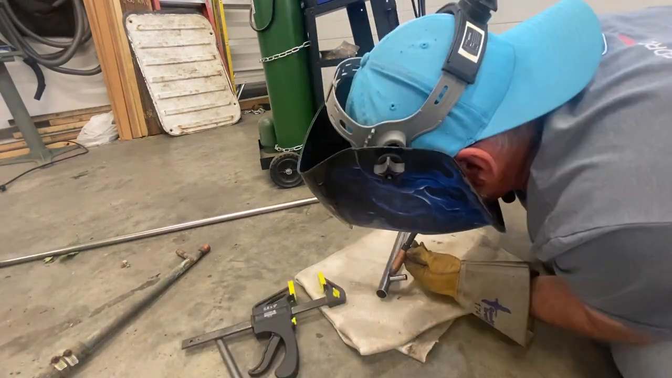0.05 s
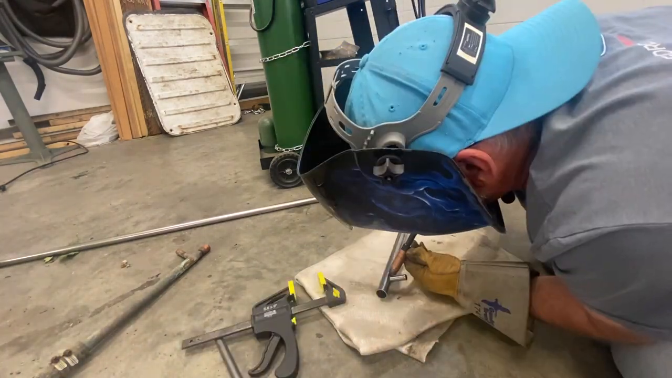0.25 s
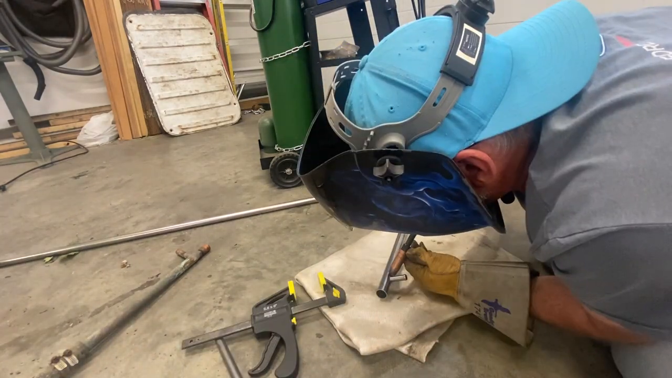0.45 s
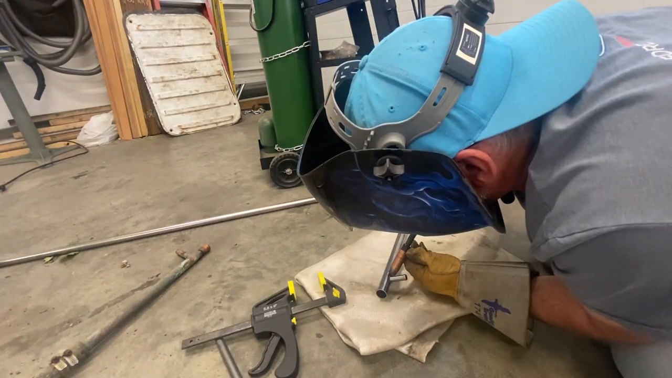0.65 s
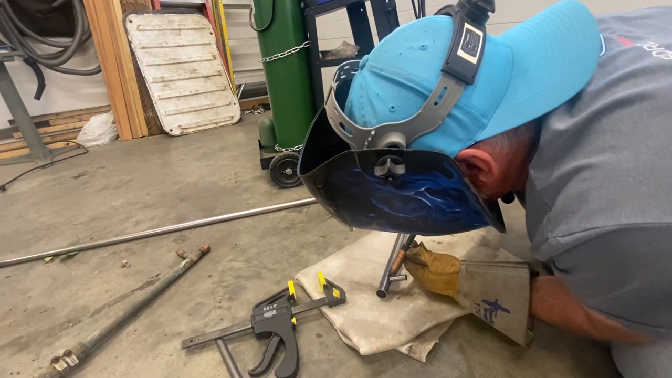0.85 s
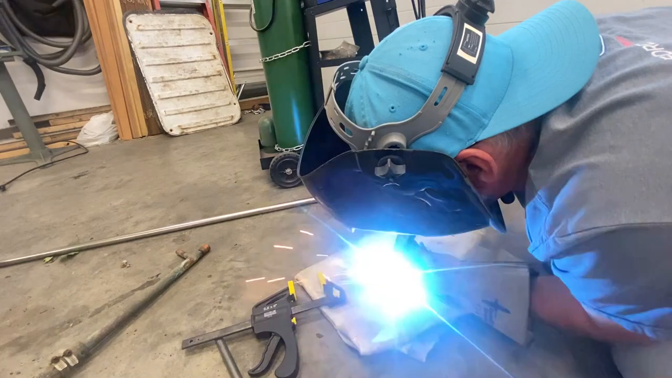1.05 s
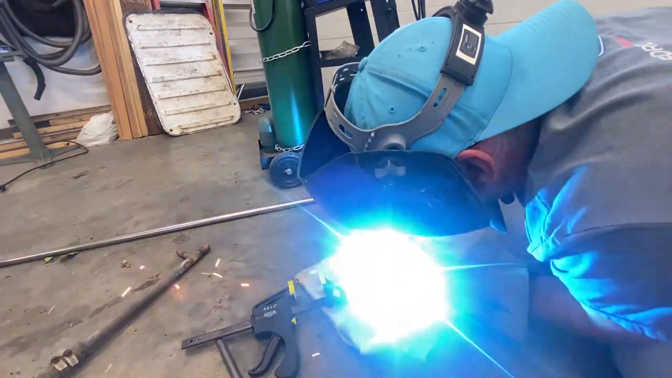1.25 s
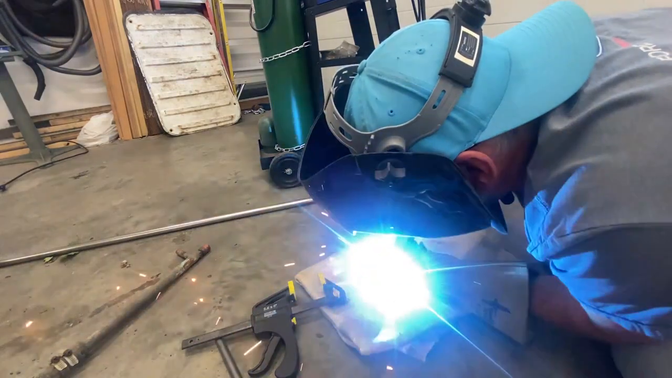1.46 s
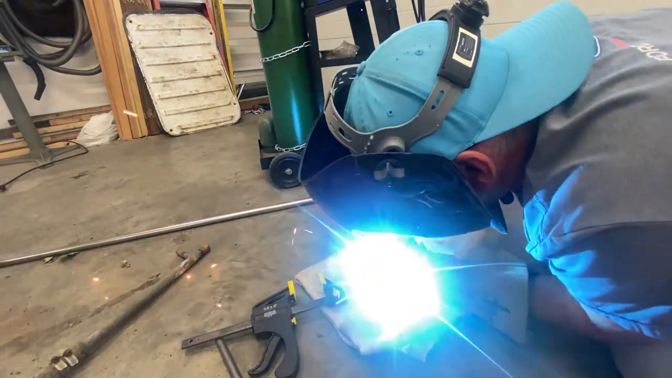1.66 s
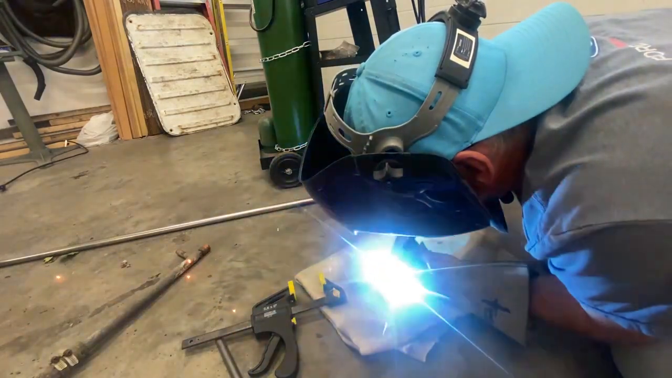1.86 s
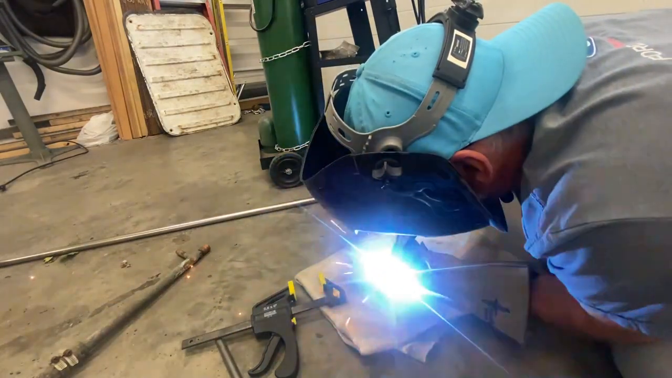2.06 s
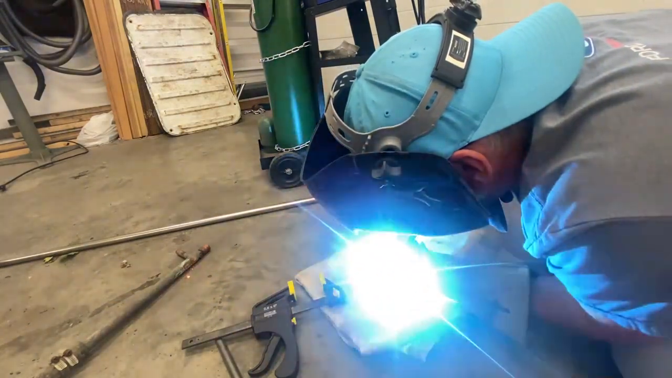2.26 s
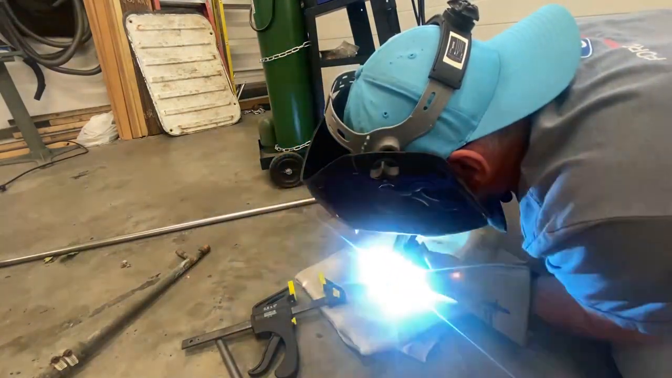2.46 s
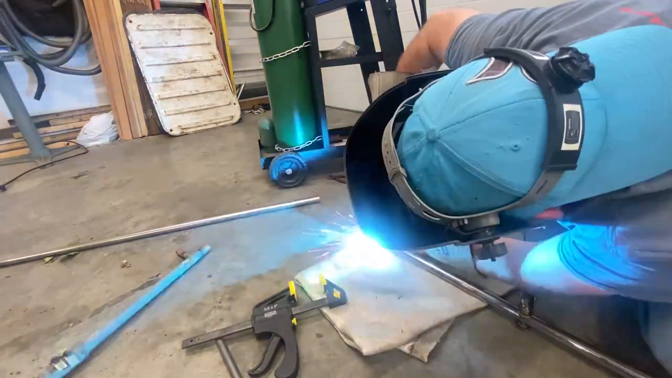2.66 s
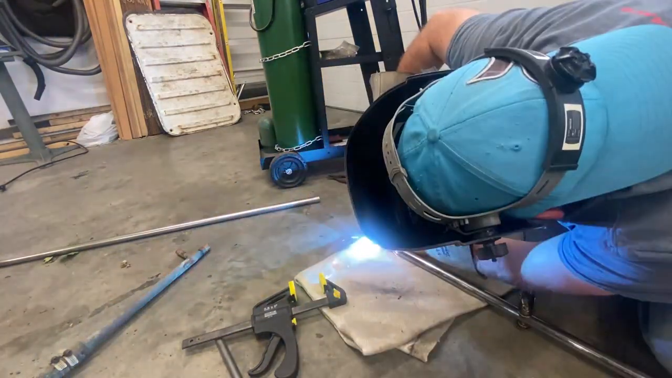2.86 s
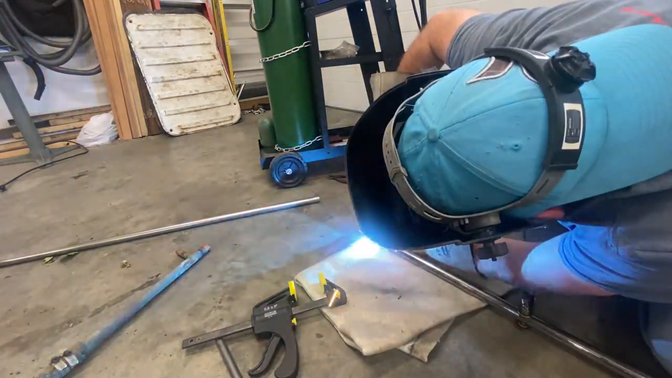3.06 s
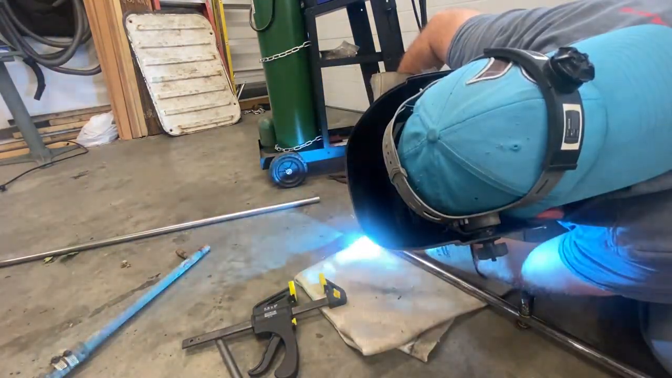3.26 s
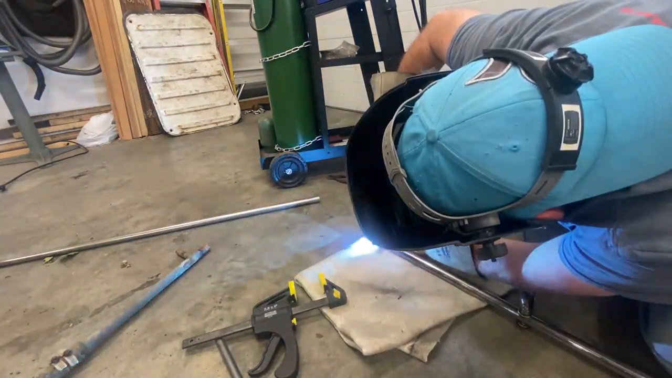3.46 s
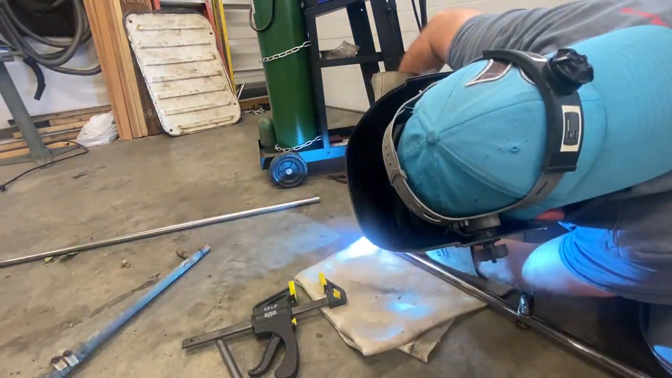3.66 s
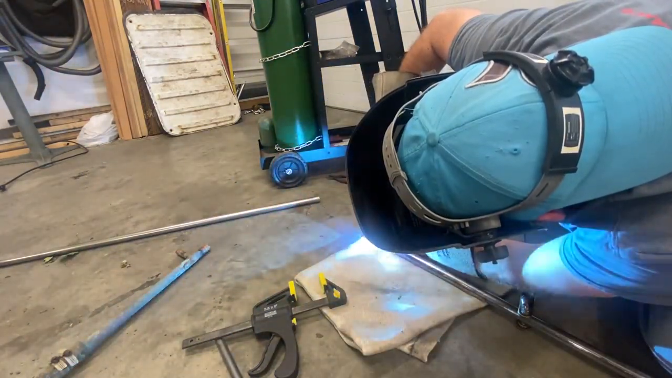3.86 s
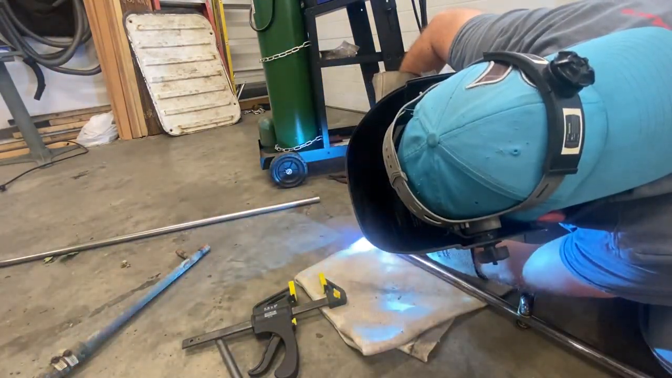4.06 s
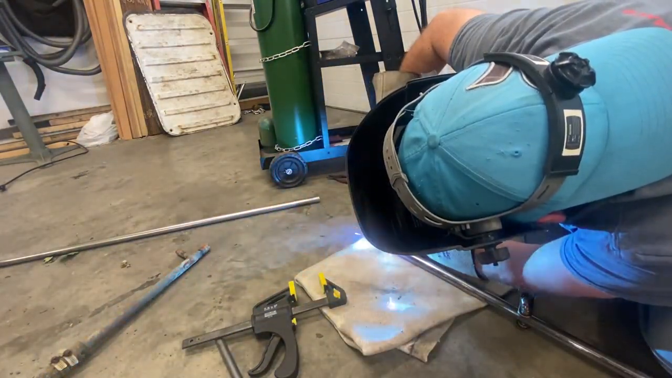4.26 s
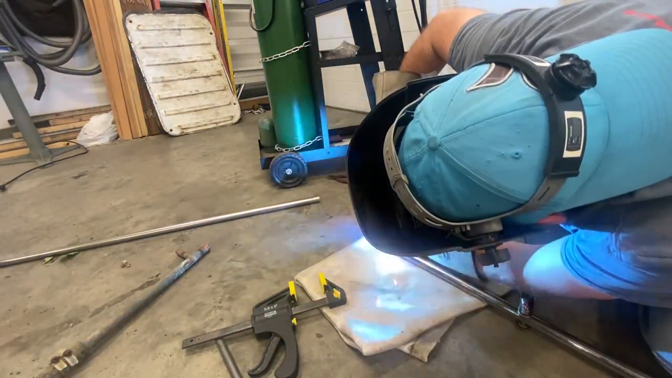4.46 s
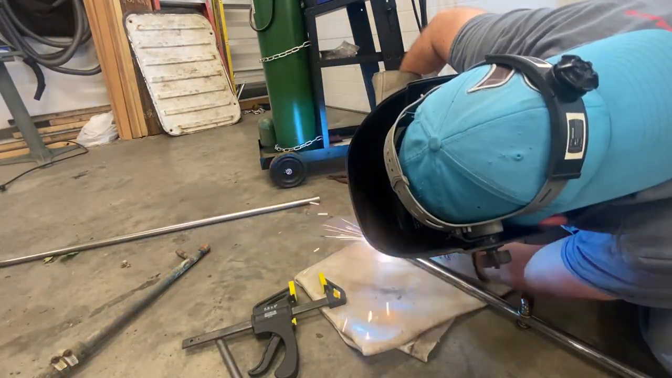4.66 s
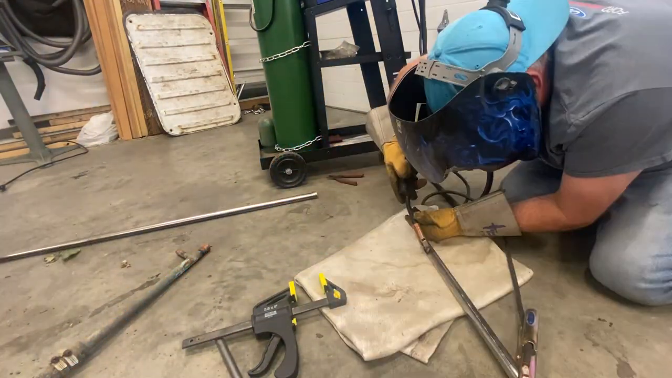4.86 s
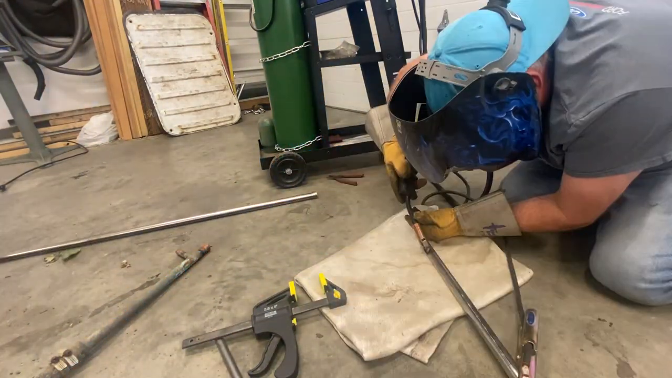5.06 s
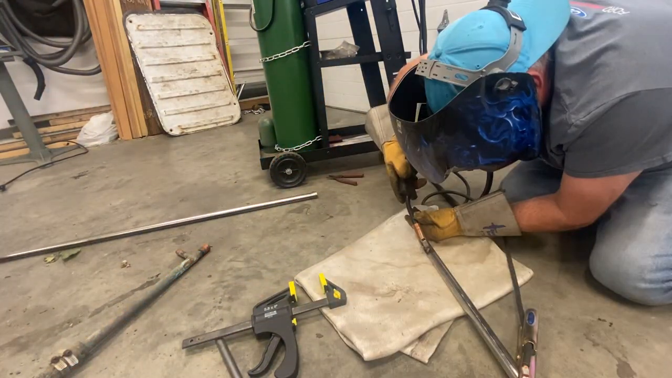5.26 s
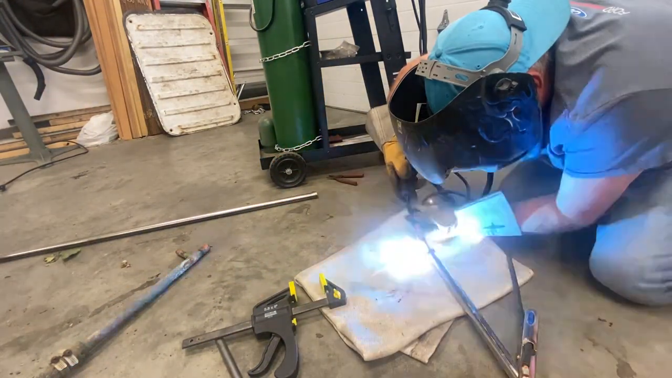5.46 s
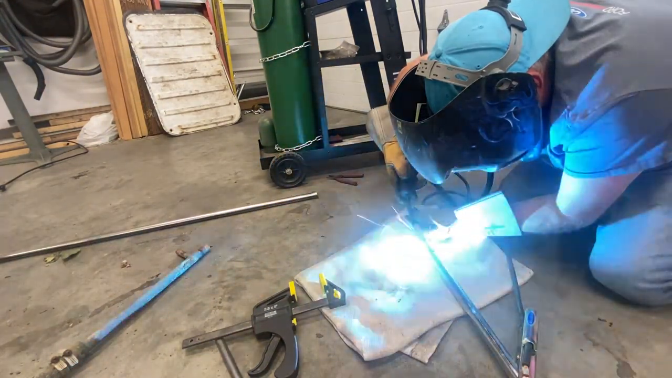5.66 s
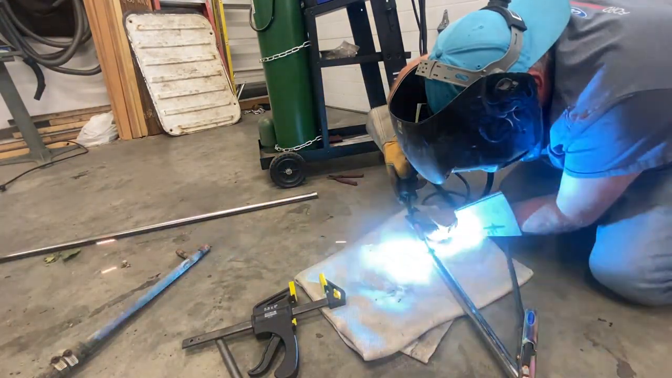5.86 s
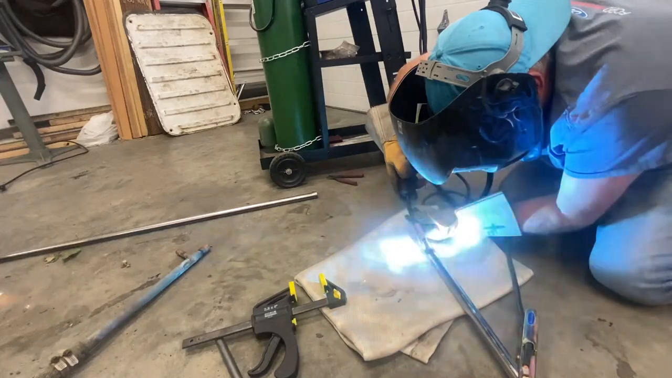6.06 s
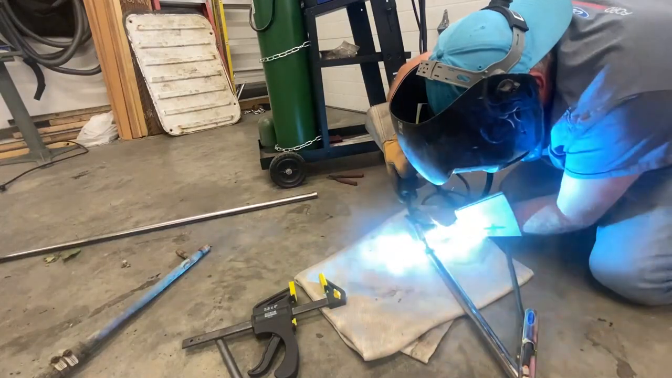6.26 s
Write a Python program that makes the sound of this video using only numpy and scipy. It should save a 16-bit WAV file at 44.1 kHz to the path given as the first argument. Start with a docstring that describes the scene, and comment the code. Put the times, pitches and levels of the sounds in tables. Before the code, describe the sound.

Three short electric welds on metal pipe, heard close up in a hard-walled garage. Each has buzzing, frying hiss and irregular rapid pops over steady gas flow and machine hum. The first is bright and snappy, the second bassy and muffled, fading to fine crackle. The third begins with gas hiss and motor whir, then spits strongly until it stops. Changes between welds are abrupt.

```python
"""Silence first; then gas hiss and a machine's hum fade in: a wire-feed welder in a concrete garage.
A feeder motor whirs up and the arc sizzles with the mains ripple, under sharp pops.
Each pop is a short circuit of the wire breaking: a filtered thud, a shove of air, a snap and crackle.
Three short welds, each from another position, are cut hard together; concrete walls return a short tail."""
import sys
import numpy as np
from scipy import signal
from scipy.fft import rfft, irfft
from scipy.io import wavfile
from scipy.ndimage import map_coordinates

SR = 44100
rng = np.random.default_rng(int(sys.argv[2]) if len(sys.argv) > 2 else 0)


def makeup_ratio(level_db):
    """Linear amplitude ratio for a level in decibels (20 dB per factor of ten)."""
    decades = np.asarray(level_db, float) / 20
    return 10 ** decades


def digitize_waveform(pressure):
    """Quantize a signal to 16-bit integers and store it at the path in sys.argv[1].

    Rows of a 2-D input are taken as channels; values are limited to [-1, 1].
    """
    field = np.atleast_2d(pressure).T
    bounded = np.clip(field, -1, 1)
    quanta = np.round(bounded * 32767).astype(np.int16)
    wavfile.write(sys.argv[1], SR, quanta)


N = 278712
T = np.arange(N) / SR

# fan blade tone, one a weld: pitch_hz
BLADE_HZ = (237.6, 236.9, 236.2)
# fan blade tone and its harmonics: multiple, relative level_db
FAN_TONES = [(1, 5.5), (2, 2.5), (3, -5), (5, 6.5), (7, 8)]
# gas jet and fan air, one list a weld: pitch_hz, width_hz, relative level_db
GAS_1 = [(380, 130, -5.5), (750, 310, -4), (1480, 300, 1), (1600, 70, 3.5), (3320, 490, -13),
         (4290, 420, 5), (5600, 820, -2.5), (6300, 1100, -6.5), (8650, 600, 4.5), (12700, 2600, -10.5)]
GAS_2 = [(340, 600, 10.5), (1600, 550, 15), (3500, 3300, -9), (6200, 3000, -6), (12300, 2700, -1)]
GAS_3 = [(71.3, 36, -6), (464, 330, -5.5), (783, 110, -1.5), (1350, 440, 0), (1610, 340, -1),
         (4350, 720, -8.5), (5300, 640, -1), (6050, 1130, 5), (7400, 1100, -4.5), (8860, 510, 0),
         (12400, 1700, -6), (14300, 1500, -3.5)]
# garage decay: pitch_hz, t60_s
GARAGE_DECAY = [(200, 0.3), (1500, 0.23), (6000, 0.36), (14000, 0.36)]
# treble sent back by the walls, without the nozzle's beam: pitch_hz, width_hz, relative level_db
DIFFUSE = [(4090, 3000, 1.5), (7580, 2900, 5), (8800, 860, 2.5), (15100, 2700, -6)]
# floor, body and cart bounces, one list a weld: delay_ms, level_db
BOUNCES = [
    [(1.3, -8.5), (2.5, -11), (5.0, -15.5)],
    [(.82, -9.5), (2.46, -5.5), (2.86, -10.5), (4.37, -14)],
    [(.66, -9.5), (2.39, -9), (4.92, -16.5)],
]
# nozzle and pipe resonances in the arc's treble, one list a weld: pitch_hz, width_hz, relative level_db
ARC_1 = [(3480, 920, -5), (4346, 444, 6), (5230, 770, -8), (6620, 1900, -5.5), (8710, 690, 4.5),
         (11880, 730, -11.5), (13000, 700, -3), (14580, 530, 1), (14700, 570, -21)]
ARC_2 = [(2655, 730, -3), (4440, 2130, -8), (5800, 420, -6), (7440, 960, -1), (8900, 1270, -6.5),
         (11870, 1780, -1.5), (13400, 900, -5), (14830, 1000, -3.5)]
ARC_3 = [(4298, 260, -10), (5230, 650, -7), (7160, 2040, -3), (8900, 370, -1), (11700, 400, -6),
         (13200, 1400, -9), (14700, 850, -3)]
# gain of the arc's middle band, between bass and fizz: time_s, level_db
SHADE = [(1.1, -4), (2.6, 1.5), (2.7, 4), (3.3, -0.5), (3.8, -4), (4.76, -2), (5.4, -2), (6.3, 3)]
# the burning arc between pops, one list a weld, before its colour: time_s, level_db
SIZZLE = [
    [(1.078, -48.5), (1.458, -42), (2.612, -51)],
    [(2.688, -58), (2.708, -54), (2.72, -45.5), (3.18, -38), (4.76, -44.5)],
    [(5.415, -60), (5.801, -47.5), (6.32, -42)],
]
# single arc re-ignitions, loud and faint, levels before colour and room: time_s, thud_db, crack_db
POPS = [(1.086, -19, -10), (1.1759, -37, -12), (1.185, -24, -23), (1.2663, -18.5, -17.5),
        (1.282, -18.5, -18.5), (1.2944, -24.5, -19.5), (1.3114, -28, -29), (1.3251, -18, -14),
        (1.3394, -17.5, -27), (1.3594, -20, -19.5), (1.368, -18, -15), (1.3747, -16, -13),
        (1.407, -23, -20.5), (1.415, -21.5, -19), (1.422, -17, -19.5), (1.4388, -24, -26),
        (1.468, -22, -17), (1.4765, -28, -12), (1.483, -27, -17.5), (1.499, -41, -17), (1.516, -27, -13),
        (1.5244, -21.5, -19.5), (1.565, -28, -19.5), (1.5792, -29, -20), (1.624, -25, -18),
        (1.6347, -29, -25), (1.6505, -26, -20), (1.6757, -23.5, -22), (1.6911, -22.5, -17.5),
        (1.7325, -26, -20.5), (1.7491, -22.5, -18), (1.767, -15, -19), (1.7984, -28, -17.5),
        (1.845, -35, -25.5), (1.8586, -26.5, -19.5), (1.8896, -26.5, -23.5), (1.9085, -24, -23),
        (1.9247, -21.5, -19.5), (1.9416, -23, -21), (1.9583, -29, -25), (1.985, -37, -27),
        (2, -23.5, -20.5), (2.0666, -23, -20.5), (2.083, -27, -28), (2.101, -24.5, -20.5),
        (2.117, -21.5, -18.5), (2.141, -35, -25), (2.1578, -23.5, -23), (2.2341, -25.5, -21),
        (2.2421, -26, -25), (2.2571, -17, -20), (2.28, -37, -23), (2.309, -29, -23), (2.3179, -27, -23.5),
        (2.3253, -20.5, -19.5), (2.3853, -31, -25.5), (2.3929, -27, -27.5), (2.4, -19, -21.5),
        (2.442, -33, -25), (2.45, -23.5, -25), (2.466, -21, -19.5), (2.4889, -36, -30),
        (2.5026, -28.5, -28), (2.5272, -34, -25), (2.534, -24, -24), (2.5419, -23.5, -20.5),
        (2.5488, -20, -30), (2.5998, -24.5, -29.5), (2.6088, -31, -28), (2.7001, -29, -42),
        (2.7155, -8.5, -17.5), (2.7734, -23, -27.5), (2.8396, -17, -17.5), (2.8722, -13, -22.5),
        (2.9076, -13, -22), (2.915, -21, -22), (2.9175, -11.5, -28), (2.9222, -20, -34), (2.938, -22, -28),
        (2.9501, -16.5, -26), (2.9564, -19, -25), (2.9675, -18.5, -26), (2.974, -17.5, -29),
        (2.9826, -17, -23), (2.9917, -15, -22), (3.0066, -12.5, -19), (3.0171, -10.5, -20.5),
        (3.034, -13, -20), (3.0482, -13.5, -21.5), (3.063, -21, -27), (3.0801, -18.5, -26),
        (3.096, -19.5, -27), (3.1109, -17.5, -27.5), (3.125, -20, -31), (3.142, -15.5, -21.5),
        (3.158, -13.5, -19.5), (3.1655, -23, -28), (3.1906, -19, -20), (3.2071, -17.5, -21.5),
        (3.2228, -18.5, -23), (3.2411, -15, -17.5), (3.258, -16, -20), (3.2732, -17, -28),
        (3.2894, -21, -33), (3.307, -16, -20), (3.324, -13, -17), (3.3389, -16.5, -26),
        (3.3736, -16, -19.5), (3.3902, -18, -23), (3.4072, -17.5, -24.5), (3.4487, -23.5, -27.5),
        (3.4639, -19, -22.5), (3.476, -25, -29), (3.5233, -26, -28), (3.5403, -18, -26), (3.556, -18, -22),
        (3.6068, -21, -26), (3.6125, -15, -24.5), (3.6255, -27, -29), (3.6472, -19, -24),
        (3.6833, -23, -28), (3.7077, -19, -20), (3.7237, -17.5, -20.5), (3.7572, -27, -25.5),
        (3.7653, -25.5, -26.5), (3.7816, -22.5, -26), (3.805, -25, -31), (3.8478, -22.5, -25),
        (3.8647, -29, -29), (3.893, -24.5, -24), (3.8991, -21.5, -24), (3.91, -36, -26.5),
        (3.9249, -27.5, -30), (3.9575, -33, -30), (3.9731, -22, -25), (4.0157, -25, -32),
        (4.0228, -27, -28), (4.058, -22.5, -24), (4.063, -28, -37), (4.081, -25, -27.5), (4.092, -28, -26),
        (4.108, -21.5, -27), (4.1155, -23, -28), (4.1317, -27, -26), (4.1482, -26, -29), (4.156, -28, -32),
        (4.1978, -22.5, -24.5), (4.207, -30, -29), (4.223, -23.5, -26), (4.2325, -27, -31),
        (4.2485, -24.5, -27.5), (4.2982, -23, -27), (4.333, -29, -31), (4.3496, -25, -29),
        (4.4074, -26.5, -29), (4.4169, -27, -29), (4.4241, -27.5, -28.5), (4.4678, -30, -29),
        (4.499, -27, -29), (4.5344, -29, -29.5), (4.5502, -28, -29), (4.573, -27.5, -31), (4.607, -38, -38),
        (4.6253, -27.5, -29.5), (4.6652, -26, -30), (4.705, -33, -33), (4.7233, -33, -34),
        (5.4226, -27.5, -20.5), (5.4322, -50, -32), (5.5056, -21.5, -19), (5.5786, -22.5, -17.5),
        (5.652, -39, -29), (5.6581, -22, -21), (5.6758, -15, -17), (5.689, -22, -23.5), (5.7182, -22, -21),
        (5.7264, -21.5, -23.5), (5.742, -21, -19.5), (5.7595, -17.5, -20), (5.778, -20, -22),
        (5.8106, -18, -16.5), (5.8667, -23, -21.5), (5.875, -22.5, -25), (5.8939, -17.5, -21.5),
        (5.9019, -19.5, -23), (5.9111, -21, -24), (5.9247, -20.5, -22), (5.9447, -16.5, -21),
        (5.967, -19.5, -23), (5.9858, -14.5, -21), (5.9944, -17, -23), (6.0191, -17.5, -21),
        (6.0683, -19, -21.5), (6.0848, -17.5, -22.5), (6.1585, -22, -22.5), (6.1676, -21, -22.5),
        (6.1778, -20, -22), (6.2011, -20, -25), (6.2096, -18, -21.5), (6.2604, -21, -29),
        (6.2686, -19, -21)]
# runs of further pops on crests of the mains ripple:
# first_crest_s, end_s, mean thud_db, mean crack_db, chance a crest (0-1)
RUNS = [(1.3942, 1.67, -30, -25.5, 0.52), (3.754, 4.029, -32, -27.5, 0.46), (4.07, 4.271, -27.5, -32, 0.43),
        (4.317, 4.48, -38.5, -38, .6), (4.5322, 4.759, -40, -39, 0.5), (6.1852, 6.258, -34, -30.5, .7),
        (6.293, 6.312, -29.5, -28.5, 1)]
# welds, levels relative: start_s, end_s, trigger_s, gas_db, fan_db, hum_db (under the sizzle),
# sizzle_bass_db (over treble), thud_low_hz, bass_cut_hz (steeper), thud_top_hz, shove_db, whine_db
WELDS = [(.6, 2.615, 1.005, -54.5, -74.5, -26.5, 3.3, 200, 200, 1606, -5, -16),
         (2.615, 4.765, 2.67, -66.5, -86, -25.5, 2.6, 1220, 150, 1773, 2.5, -20),
         (4.762, 6.33, 5.36, -55, -73.5, -32, 7.3, 330, 275, 1600, 9, -1.5)]

RIPPLE_HZ = 120  # the rectified mains current
IDLE_HUM_DB = -6  # three times the ripple, from the idling transformer, relative to the fan
RUSH_HZ, RUSH_WIDTH_HZ, RUSH_DB, RUSH_T60_S = 5760, 400, -43, 0.67
CREST_JITTER_S = 0.0008
POP_SPREAD_DB = 3.5  # shared by thud and crack; the thud gets a second draw of its own
REST_S = 0.006  # the bridge needs this long to form around a single pop
REPEAT = 0.7  # share of pops that still come on the crest right after another, 0-1
RISE = 31  # samples until a thud reaches its first trough
SNAP = 21  # samples until the rupture, just ahead of the trough
SHOVE_DB, SHOVE_GROWS = 18, 1.83  # a stronger crack pushes more than its share of air
DIP_HZ, DIP_WIDTH_HZ, DIP_DEPTH = 531, 44, 0.82  # depth: share of the band taken away
BUMP_HZ, BUMP_WIDTH_HZ, BUMP_DB = 655, 68, -1.5  # level of the band added on top
CLIP_TOP = 1  # the input rounds off peaks near this amplitude
TOP_HZ = 15500


def unit(x):
    """Scales a sound to an rms of one."""
    return x / np.sqrt(np.mean(x ** 2) + 1e-20)


def wobble(rate):
    """A smooth random curve, rate knots a second."""
    knots = rng.standard_normal(int(N * rate / SR) + 4)
    return map_coordinates(knots, [T * rate])


def level_curve(rows, silent_db):
    """Levels in dB joined by straight lines, with silent_db before and after."""
    s, db = np.transpose(rows)
    return np.interp(T, s, db, silent_db, silent_db)


def passed(x, hz, kind, order):
    """Butterworth filter."""
    return signal.sosfilt(signal.butter(order, hz, kind, fs=SR, output="sos"), x)


def through(x, h):
    """Rings a sound through an impulse response."""
    return signal.fftconvolve(x, h)[:N]


def colour(peaks, base_db, low_hz, point=2):
    """Causal impulse response, energy 1: bell resonances on a flat base with a bass roll-off.
    A lower point sharpens the tips."""
    f = np.fft.rfftfreq(8192, 1 / SR)
    power = makeup_ratio(2 * base_db)
    for centre_hz, width_hz, db in peaks:
        power = power + makeup_ratio(2 * db - 10.1 * np.abs(2 * (f - centre_hz) / width_hz) ** point)
    power = power / (1 + (low_hz / (f + 1)) ** 2) ** 2
    # folding the cepstrum gives minimum phase
    cepstrum = irfft(np.log(power + 1e-12) / 2)
    cepstrum[1:4096] *= 2
    cepstrum[4097:] = 0
    h = irfft(np.exp(rfft(cepstrum)))[:4096]
    return h / np.linalg.norm(h)


def fan(blade_hz):
    """Slightly unsteady blade tones, with the idling transformer's faint hum."""
    blades = np.zeros(N)
    for multiple, db in FAN_TONES:
        level = makeup_ratio(db - 4.5 + 2.2 * wobble(15))
        blades += level * np.sin(2 * np.pi * multiple * blade_hz * T + 0.63 * wobble(5.6))
    idle_hum = makeup_ratio(IDLE_HUM_DB + 3 * wobble(15)) * np.sin(2 * np.pi * RIPPLE_HZ * 3 * T)
    return blades + idle_hum


def gas_air(peaks, gas_db):
    """Shielding gas and fan air: turbulent noise in the resonances of its path, slightly unsteady."""
    air = through(rng.standard_normal(N), colour(peaks, base_db=-17.5, low_hz=55, point=1.4))
    return air * makeup_ratio(gas_db + 0.5 * wobble(23))


def feeder(trigger_s, whine_db):
    """The wire-feed motor whirs up once the trigger is pulled: noise in three resonances."""
    peaks = [(1830, 390, whine_db), (1220, 740, -8), (353, 410, -3)]
    whir = through(rng.standard_normal(N), colour(peaks, base_db=-31.5, low_hz=200))
    return makeup_ratio(-54.5) * whir * np.clip((T - trigger_s) / 0.043, 0, 1)


def hum(rows, under_db):
    """The loaded transformer buzzes at the ripple frequency and its octave while the arc burns."""
    level = makeup_ratio(level_curve([(s, db + under_db) for s, db in rows], -140) + 2.7 * wobble(25.15))
    ripple = np.sin(2 * np.pi * RIPPLE_HZ * T)
    octave = makeup_ratio(5.5) * np.sin(2 * np.pi * RIPPLE_HZ * 2 * T)
    return level * (ripple + octave)


def rush():
    """A narrow bright hiss that follows the very first strike and dies away."""
    since = T - POPS[0][0]
    resonance = colour([(RUSH_HZ, RUSH_WIDTH_HZ, 20)], base_db=-10, low_hz=RUSH_HZ / 2)
    hiss = through(rng.standard_normal(N), resonance)
    return hiss * (since > 0) * makeup_ratio(RUSH_DB - 60 * np.abs(since) / RUSH_T60_S)


def garage(x, block_s=0.3):
    """Diffuse tail, each band dying at its own speed; the welder moves, so the tail keeps changing."""
    out, step = np.zeros(N + SR), int(block_s * SR)
    decay_hz, decay_s = np.transpose(GARAGE_DECAY)
    for i in range(0, N, step):
        hz, t, z = signal.stft(rng.standard_normal(SR // 2), SR, nperseg=256)
        t60 = np.interp(np.log(hz + 1), np.log(decay_hz), decay_s)
        tail = signal.istft(z * makeup_ratio(-60 * t / t60[:, None]), SR, nperseg=256)[1]
        tail *= 1 - np.exp(-np.arange(len(tail)) / SR / 0.00048)  # the tail builds up, time in s
        wet = signal.fftconvolve(x[i:i + step], tail / np.linalg.norm(tail))
        out[i:i + len(wet)] += wet
    return out[:N]


def bounced(x, bounces):
    """The sound and its nearest echoes, from floor, body and cart."""
    out = x.copy()
    for delay_ms, db in bounces:
        out += makeup_ratio(db) * np.pad(x, (round(delay_ms * SR / 1000), 0))[:len(x)]
    return out


def shaded(x):
    """The band between bass and fizz rises and falls slowly."""
    band = signal.butter(3, (1900, 6400), "band", fs=SR, output="sos")
    middle = signal.sosfiltfilt(band, x)
    return x + (makeup_ratio(np.interp(T, *np.transpose(SHADE))) - 1) * middle


def sizzle(rows):
    """Plasma noise swelling with the rectified current, peppered with tiny spatter."""
    ripple = makeup_ratio(0.98 * np.sin(2 * np.pi * RIPPLE_HZ * T) + 2.03 * wobble(60))
    spatter = (rng.random(N) < 300 / SR) * rng.standard_normal(N)  # about 300 a second
    noise = unit(ripple * (rng.standard_normal(N) + 1.8 * spatter))
    return noise * makeup_ratio(level_curve(rows, -120))


def crest_pops():
    """Each ripple crest inside a run may break the bridge; a pop just before makes that less likely."""
    rows = []
    for first_s, end_s, thud_db, crack_db, chance in RUNS:
        for s in np.arange(first_s, end_s, 1 / RIPPLE_HZ):
            rows.append((s, thud_db, crack_db, chance))
    rows = np.array(rows)
    luck = rng.random((len(rows), 2))
    late, size, tilt = rng.standard_normal((3, len(rows)))
    near_single = np.abs(rows[:, :1] - np.array(POPS)[:, 0]).min(axis=1) < REST_S
    ready = luck[:, 0] < rows[:, 3]
    after_pop = np.roll(ready | near_single, 1)
    breaks = ready & ~near_single & (~after_pop | (luck[:, 1] < REPEAT))
    spread = [CREST_JITTER_S * late, POP_SPREAD_DB * (size + tilt), POP_SPREAD_DB * size]
    return (rows[:, :3] + np.transpose(spread))[breaks]


def pops(t0, t1):
    """The molten bridge blows: a pressure step, a slow shove of air, a snap and a spray of crackle.
    One also hears some noise swell up ahead of each pop."""
    s, thud_db, crack_db = np.vstack([POPS, crest_pops()]).T
    at = np.round(s * SR).astype(int) - RISE
    inside = (s >= t0) & (s < t1)
    step = np.bincount(at, inside * makeup_ratio(thud_db), N)
    shove_db = SHOVE_GROWS * crack_db + SHOVE_DB + 1.8 * rng.standard_normal(len(s))
    shove = passed(np.bincount(at, inside * makeup_ratio(shove_db), N), 93, "low", order=3)
    snap = np.bincount(at + SNAP, -1 * inside * makeup_ratio(crack_db + 8), N)  # the instant of rupture
    lead = SR // 200
    u = np.arange(-lead, SR // 40) / SR
    before = makeup_ratio(60 * u / 0.0037) * 0.5 + 0.097 * makeup_ratio(60 * u / 0.032)
    after = 0.73 * makeup_ratio(-60 * u / 0.0084) + 0.31 * makeup_ratio(-60 * u / 0.037)
    bursts = np.bincount(at + RISE, inside * makeup_ratio(crack_db), N)
    envelope = signal.fftconvolve(bursts, np.where(u < 0, before, after))[lead:][:N]
    return step, shove, snap, envelope * rng.standard_normal(N)


def thud(x, low_hz, cut_hz, top_hz, bounces):
    """Bass of the arc: a short inward-first swing under a steep ceiling, then its bounces."""
    click = np.eye(1, 2048)[0]
    swing = passed(click, top_hz, "low", order=12)
    swing = passed(swing, low_hz, "high", order=1)
    swing = passed(swing, cut_hz, "high", order=2)
    swing = bounced(swing, bounces)
    return through(x, -swing / np.abs(swing).max())


def arc_sound(weld, rows, bounces, arc):
    """Pops and sizzle of one weld: bass swing, air and nozzle treble, direct and off the walls."""
    t0, t1, _, _, _, _, bass_db, low_hz, cut_hz, top_hz, shove_db, _ = weld
    step, shove, snap, spray = pops(t0, t1)
    spray = spray + bounced(snap, bounces)
    hiss = sizzle(rows)
    push = step + makeup_ratio(-29.5) * spray + makeup_ratio(bass_db - 24.5) * hiss
    bass = thud(push, low_hz, cut_hz, top_hz, bounces)
    treble = through(spray + hiss, colour(arc, base_db=-14.5, low_hz=1740))
    direct = bass + makeup_ratio(shove_db) * shove + treble
    wall_treble = through(spray + hiss, colour(DIFFUSE, base_db=-8.0, low_hz=1500))
    walls = garage(makeup_ratio(-6.0) * bass + makeup_ratio(-10.5) * wall_treble)
    return shaded(direct + walls)


def scene():
    """Each weld with its own colour, cut hard against the next; the whole fades in after silence."""
    out = np.zeros(N)
    arcs, gases = (ARC_1, ARC_2, ARC_3), (GAS_1, GAS_2, GAS_3)
    for weld, rows, bounces, blade_hz, arc, gas in zip(WELDS, SIZZLE, BOUNCES, BLADE_HZ, arcs, gases):
        t0, t1, trigger_s, gas_db, fan_db, hum_db = weld[:6]
        whine_db = weld[-1]
        background = gas_air(gas, gas_db) + makeup_ratio(fan_db) * fan(blade_hz)
        machine = feeder(trigger_s, whine_db) + hum(rows, hum_db)
        sound = background + machine + arc_sound(weld, rows, bounces, arc)
        out += sound * np.clip((T - t0) / 0.0013, 0, 1) * np.clip((t1 - T) / 0.0012, 0, 1)
    out = out + rush()
    fade_in = np.clip((T - 0.6) / 0.031, 0, 1) ** 2
    return (out * fade_in)[None]


def roll_off(x):
    """The treble ends steeply here."""
    return signal.sosfilt(signal.butter(12, 16480, fs=SR, output="sos"), x)


def record(dry):
    """The microphone's housing dips and lifts two bands; peaks clip softly under a steep band limit."""
    def band(hz, width_hz):
        return signal.lfilter(*signal.iirpeak(hz, hz / width_hz, SR), dry)

    x = dry - DIP_DEPTH * band(DIP_HZ, DIP_WIDTH_HZ) + makeup_ratio(BUMP_DB) * band(BUMP_HZ, BUMP_WIDTH_HZ)
    x = x / (1 + np.abs(x / CLIP_TOP) ** 4) ** 0.25
    mix = passed(x, TOP_HZ, "low", order=24)
    return roll_off(mix)


dry = scene()
out = record(dry)
digitize_waveform(out)
```